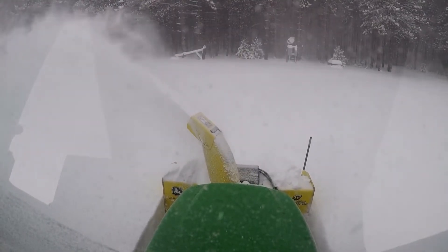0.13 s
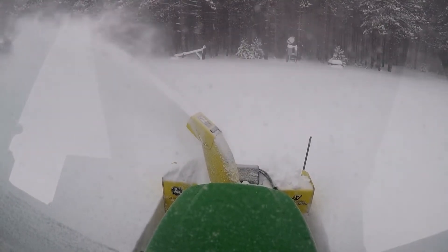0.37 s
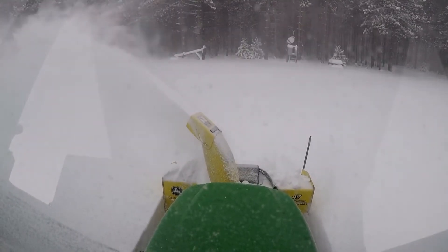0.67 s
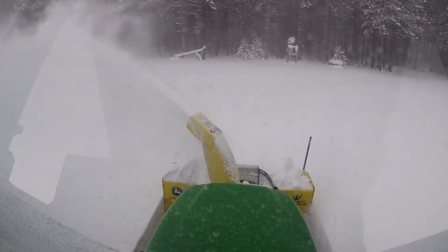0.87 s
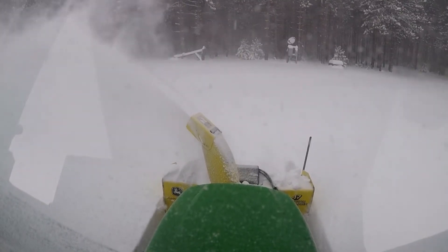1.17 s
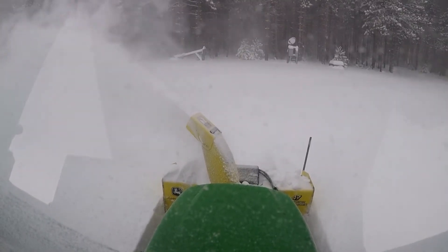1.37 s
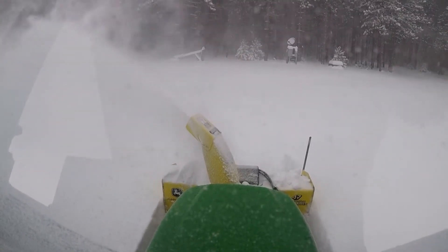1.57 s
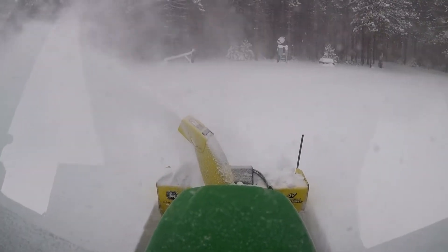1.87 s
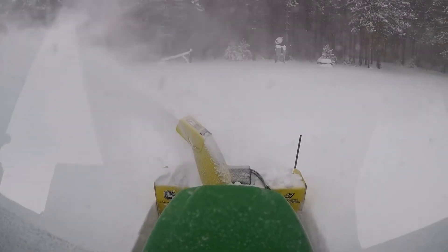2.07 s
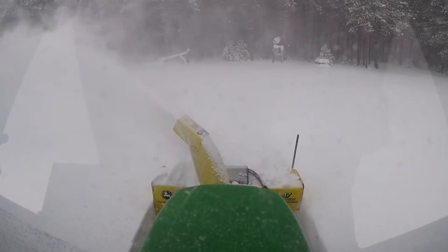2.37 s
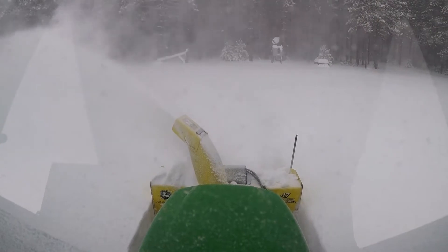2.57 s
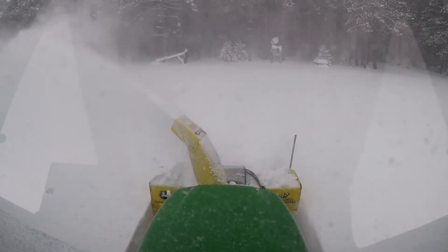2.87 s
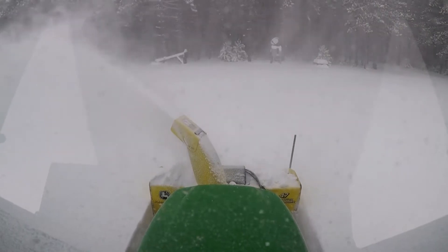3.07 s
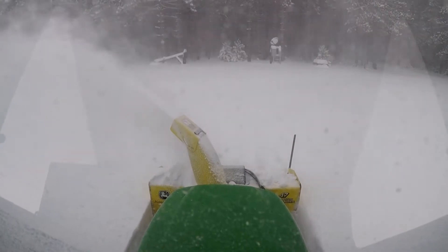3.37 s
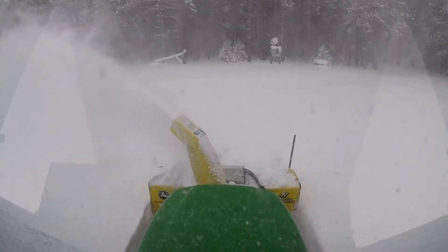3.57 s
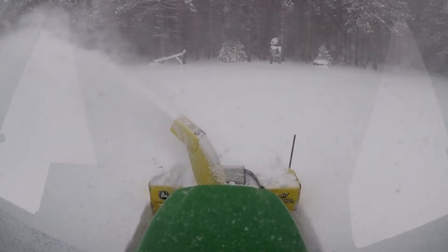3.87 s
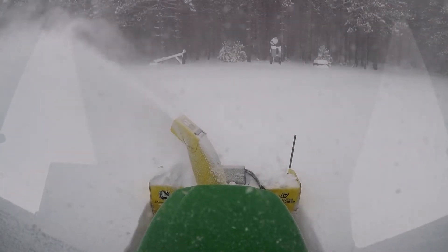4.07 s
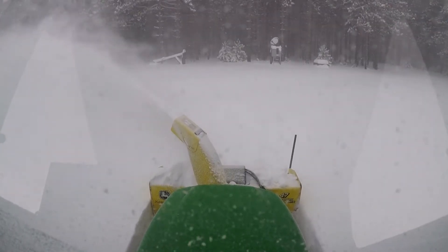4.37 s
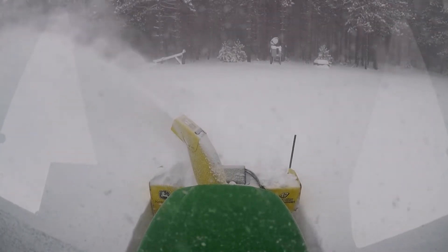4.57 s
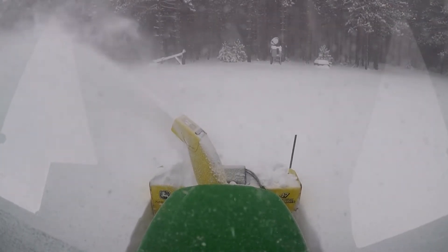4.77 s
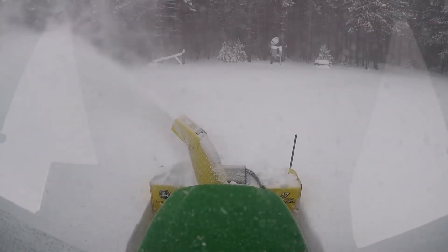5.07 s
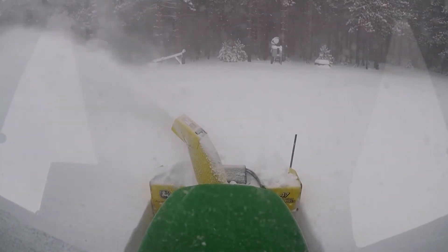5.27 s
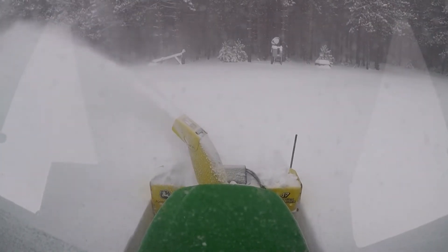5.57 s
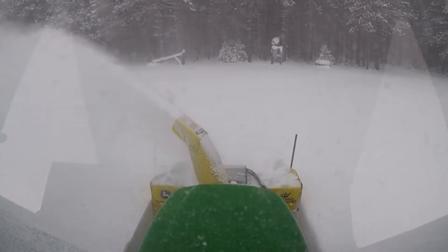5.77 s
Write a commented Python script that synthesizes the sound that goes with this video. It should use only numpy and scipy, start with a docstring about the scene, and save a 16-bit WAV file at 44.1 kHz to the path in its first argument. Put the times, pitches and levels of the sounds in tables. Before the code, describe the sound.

Continuous close engine drone outdoors, dense and low, with fast firing pulses blurred into a buzz. Belt and blower tones beat slowly against it, making the low end pulse and swell, more so in the second half. The housing boom is fuller at first and eases later, while thin gear whine comes and goes. Soft snow hiss sits on top. The microphone rides on the machine; the sound is compressed, dense and even.

```python
"""The two-cylinder engine of a garden tractor hums in firing orders as it pushes a snowblower, heard from the seat.
Exhaust and intake roar, filtered noise, throbs with the firings and rings in tin panels modelled as resonances.
The auger drags the speed once a turn, so the gear whine, a tooth mesh tone, wavers.
Impeller, pump and drive belt, sums of shaft multiples, beat against the engine.
Thrown snow, flickering bands of noise, hisses up the chute."""
import sys
import numpy as np
from scipy import signal
from scipy.fft import rfft, irfft
from scipy.io import wavfile
from scipy.ndimage import uniform_filter1d

SR = 44100
rng = np.random.default_rng(int(sys.argv[2]) if len(sys.argv) > 2 else 0)


def generate_wav(sig):
    """Save sig (samples, or channels by samples) to the path in sys.argv[1] as 16-bit PCM at SR."""
    pcm = np.round(np.clip(np.atleast_2d(sig).T, -1, 1) * 32767).astype(np.int16)
    wavfile.write(sys.argv[1], SR, pcm)


N = 261954
T = np.arange(N) / SR  # time, s
F = np.maximum(np.fft.rfftfreq(N, 1 / SR), 1)  # frequency, Hz

CYCLE_HZ = 27.39  # mean rate of the firing cycle, which is two crank turns
AUGER_HZ, AUGER_RAD = 3.03, -1.38  # turning rate and starting phase
IMPELLER_RATIO = .6  # turns per firing cycle
PIPE_SPREAD_RAD = .4  # phase lag of the engine orders, times the order squared
HISS_SHARE = 0.52  # the hiss swells by this share of the spray's extra dB


def undb(db):
    """Amplitude ratio of a level in decibels."""
    return 10 ** (np.asarray(db) / 20)


def level(x, db):
    """Scaling to a given rms level."""
    return x * undb(db) / np.sqrt(np.mean(x ** 2))


def columns(table):
    """Linear interpolation in time of each column after the first."""
    s, *cols = np.transpose(table)
    return [np.interp(T, s, c) for c in cols]


def walk(rate):
    """Low-pass random process: levels held 1 / rate s and averaged twice; spread near 1."""
    hold = int(SR / rate)
    steps = np.repeat(rng.standard_normal(N // hold + 1), hold)
    smooth = uniform_filter1d(uniform_filter1d(steps, hold), hold)
    return np.sqrt(2) * smooth[:N]


def ring(hz, width):
    """Resonance excited by noise, rms 1; the width is taken at half the peak amplitude."""
    response = 1 / (1 + (2 * (F - hz) / width) ** 2)
    return level(irfft(rfft(rng.standard_normal(N)) * response, N), 0)


def coloured(points, flicker_db, flicker_hz, shared_db):
    """Spectral shaping of noise in half-octave bands; each flickers alone and all share one level change."""
    hz, db = np.transpose(points)
    shape_db = np.interp(np.log(F), np.log(hz), db, left=-99, right=-99)
    shaped = rfft(rng.standard_normal(N)) * undb(shape_db)
    place = 2 * np.log2(F)  # in half octaves
    first = np.floor(2 * np.log2(hz[0]))
    last = np.ceil(2 * np.log2(hz[-1]))
    out = 0
    for band in np.arange(first, last + 1):
        window = np.clip(1 - np.abs(place - band), 0, 1)  # triangles that sum to 1
        out = out + irfft(shaped * window, N) * undb(flicker_db * walk(flicker_hz))
    return level(out, 0) * undb(shared_db)


def orders(angle, table, waver_db, waver_rad, spread_rad=1.3):
    """Fourier series on a shaft angle; higher multiples lag, which spreads each beat over the turn."""
    out = 0
    for k, db in table:
        phase = k * angle - spread_rad * k * k + waver_rad * walk(5)
        amplitude = np.sqrt(2) * undb(db + waver_db * walk(4.02))
        out = out + amplitude * np.sin(phase)
    return out


def crank():
    """Phase as the integral of speed: the auger's load slows it once a turn and the governor hunts."""
    auger_drag = .0053 * np.cos(2 * np.pi * AUGER_HZ * T + AUGER_RAD)  # fraction of the speed
    speed = 1 + auger_drag + 0.00076 * walk(1.982)
    return 2 * np.pi * CYCLE_HZ * np.cumsum(speed) / SR


def engine(angle, boom_db):
    """Periodic firing gives harmonics: low orders stay put, those the housing radiates follow its boom."""
    # orders of the firing cycle: multiple, level/dB (rms, before the boom)
    firing = [(1, -39), (2, -22.5), (3, -23.5), (4, -37.5), (5, -32.5), (6, -24), (7, -46), (8, -24),
              (9, -33.5), (10, -37.5), (11, -38.5), (12, -32), (13, -42.5), (19, -41.5), (24, -44),
              (30, -40), (46, -45)]
    low = orders(angle, firing[:5], waver_db=0.0, waver_rad=0.093, spread_rad=PIPE_SPREAD_RAD)
    high = orders(angle, firing[5:], waver_db=2.02, waver_rad=0.13, spread_rad=PIPE_SPREAD_RAD)
    return low + undb(0.77 * boom_db) * high


def body(angle, boom_db):
    """Forced resonance and interference: roar and ringing panels throb with the firings, paths round the hood cancel."""
    # exhaust and intake roar: f/Hz, relative spectral level/dB (per Hz)
    roar_points = [(12, -41), (20, -15.5), (66, -3.5), (124, -8.5), (216, -4.5), (337, -15.5), (399, -12),
                   (515, -15.5), (573, -13.5), (822, -11.5), (974, -17.5), (1280, -17.5), (1920, -24),
                   (2140, -23.5), (3200, -45), (4160, -80.5), (7040, -120)]
    # ringing tin: f/Hz, width/Hz, level/dB (rms, before the waver)
    panels = [(77.6, 15, -28.5), (511, 34, -39), (643, 40, -47.5), (828.6, 52, -39), (1067, 73, -42),
              (1301, 100, -42), (1430, 81, -43.5), (1609, 98, -45), (1794, 160, -46.5), (2146, 250, -41.5),
              (2643, 51, -53.5), (2740, 110, -55), (4247, 80, -55.5), (4660, 280, -54.5),
              (5720, 240, -55.5), (9500, 100, -70), (10100, 100, -73.5)]
    # blower housing: f/Hz, width/Hz, level/dB (rms, before the boom)
    housing_modes = [(199.5, 42, -27.5), (268.6, 30, -33.5), (311.5, 36, -35.5), (346.3, 19.6, -35)]
    # interference round the hood: f/Hz, width/Hz, gain/dB (mostly dips)
    hood_paths = [(376, 25, -1), (562, 17, -3.5), (1038, 16, -2), (1198, 31, -7), (1910, 89, -5),
                  (2780, 55, 1.5)]
    tin = sum(undb(db + 1.2 * walk(6)) * ring(hz, width) for hz, width, db in panels)
    modes = sum(undb(db) * ring(hz, width) for hz, width, db in housing_modes)
    housing = undb(0.82 * boom_db) * modes
    roar = coloured(roar_points, flicker_db=1.0, flicker_hz=7.8, shared_db=-24 + 0.38 * boom_db)
    throb = 1 + 0.021 * np.cos(angle) + 0.057 * np.cos(2 * angle) + 0.054 * np.cos(3 * angle)
    hood_db = sum(db * np.exp(-(2 * (F - hz) / width) ** 2) for hz, width, db in hood_paths)
    return irfft(rfft(throb * (tin + roar + housing)) * undb(hood_db), N)


def belt(angle):
    """Periodic slap of a belt loop, loudest round a wandering pitch; it also excites a frame resonance."""
    # belt slap: t/s, favoured f/Hz, slap level/dB (at the favoured pitch, before the waver)
    slap_course = [(0.0, 85.6, -28.5), (.45, 88, -29.5), (.8, 98, -30), (1.7, 99, -27), (2.05, 87, -27),
                   (2.75, 88, -22), (3.15, 93, -23), (3.5, 97.3, -21), (4.5, 99.3, -23.5), (4.85, 88, -27),
                   (5.4, 88, -22), (5.7, 94, -21.5), (5.94, 90, -21.5)]
    # multiples of the belt loop's turn
    loop_orders = (16, 17, 18)
    ratio = .2  # loop turns per firing cycle
    favoured_hz, slap_db = columns(slap_course)
    favoured_order = favoured_hz / (ratio * CYCLE_HZ)
    slaps = []
    for k in loop_orders:
        # 12 dB down one multiple off the favoured pitch, but never more than 9.5 dB
        fall_db = np.maximum(-12 * (k - favoured_order) ** 2, -9.5)
        slaps.append((k, slap_db + fall_db))
    frame = undb(slap_db - 2.5) * ring(hz=95.2, width=36)
    return orders(ratio * angle, slaps, waver_db=1.0, waver_rad=0.17) + frame


def impeller(angle):
    """Blade-passing tones of a three-blade rotor geared to the crank."""
    # multiple of the impeller's turn, level/dB (rms, before the waver)
    blades = [(1, -45.5), (2, -43.5), (3, -36), (4, -57.5), (9, -48), (12, -42)]
    return orders(IMPELLER_RATIO * angle, blades, waver_db=7.0, waver_rad=0.73)


def pump(angle):
    """Shaft harmonics of a pump geared to the crank."""
    # multiple of the pump shaft's turn, level/dB (rms, before the waver)
    shaft = [(5, -30.5), (8, -39.5), (17, -37), (20, -39.5)]
    return orders(.5726 * angle, shaft, waver_db=0.5, waver_rad=0.097)


def gear(angle, whine_db):
    """Tooth mesh tone with a side tone, modulated by the load: pushed at each crank turn and as the auger lets go."""
    push = 1 + 0.17 * np.cos(2 * angle) + 0.11 * np.cos(angle)
    free = np.cos(2 * np.pi * AUGER_HZ * T + AUGER_RAD + .9)
    mesh_order = 78.1  # multiple of the firing cycle
    teeth = [(mesh_order, whine_db - 2.5 + 2.2 * free),
             (mesh_order + 4, whine_db - 12.5 + 5 * free)]
    return push * orders(angle, teeth, waver_db=1.2, waver_rad=0.34)


def snow(angle, hiss_db, spray_db):
    """Broadband flow noise: an even rush up the chute and fine spray in uneven puffs, paced by the impeller."""
    # rush of snow: f/Hz, relative spectral level/dB (per Hz)
    rush_points = [(1650, -21), (2800, -2.5), (3220, -4), (5640, -1), (7400, -13.5), (9620, -36),
                   (16300, -120)]
    # fine spray: f/Hz, relative spectral level/dB (per Hz)
    spray_points = [(6000, 4), (7000, -3), (7600, -4.5), (8500, -2), (9800, -14.5), (11000, -17.5),
                    (11300, -26.5), (12200, -29.5), (13200, -29), (15000, -37)]
    rush = coloured(rush_points, flicker_db=0.53, flicker_hz=20, shared_db=hiss_db + .4 * walk(30))
    puffs = walk(55)
    puffs = puffs - uniform_filter1d(puffs, int(.08 * SR))  # quick ones only
    throw_db = 1.36 * np.cos(IMPELLER_RATIO * angle + 1.5 * walk(4))  # one swing an impeller turn
    spray = coloured(spray_points, flicker_db=0.8, flicker_hz=41.0,
                     shared_db=spray_db + throw_db + 1.6 * puffs)
    return rush * undb(HISS_SHARE * throw_db) + spray


def loads():
    """Trapezoidal envelopes: extra spray dB while a thicker load of snow passes up the chute."""
    # thicker loads: t/s (rise complete), length/s (from there to the end of the fall), extra spray level/dB
    passing = [(0.0, 0.89, 4.5), (1.72, .08, 3.5), (1.94, .24, 3), (3.524, 0.24, 1.5), (4.3, .25, 1)]
    edge_s = 0.058  # rise and fall time
    extra_db = 0
    for s, length, db in passing:
        nearest_end = np.minimum(T - s + edge_s, s + length - T)
        extra_db = extra_db + db * np.clip(nearest_end / edge_s, 0, 1)
    return extra_db


def scene():
    """Superposition of the sources, all but the chute's loads tied to one crank angle."""
    # work done: t/s, housing boom level/dB (its mean is removed), gear whine level/dB (before gear's offsets)
    work = [(0.0, -17.5, -36.5), (.5, -16.5, -35), (.8, -15.5, -41.5), (1.3, -17.5, -40),
            (1.75, -16, -39.5), (2.1, -19, -38.5), (2.5, -19, -51), (3.0, -21.5, -50.5), (3.7, -22.5, -43),
            (4.2, -24, -45.5), (4.5, -22, -40.5), (5.3, -21.5, -45.5), (5.5, -21, -48.5),
            (5.94, -19.5, -46.5)]
    boom_db, whine_db = columns(work)
    boom_db = boom_db - boom_db.mean()
    angle, extra_db = crank(), loads()
    drive = belt(angle) + impeller(angle) + pump(angle)
    machine = engine(angle, boom_db) + body(angle, boom_db) + drive + gear(angle, whine_db)
    thrown = snow(angle, hiss_db=-42.5 + HISS_SHARE * extra_db, spray_db=-52 + extra_db)
    return (machine + thrown)[None]


def record(dry):
    """Dynamic compression evens out the beats, soft saturation rounds peaks and a low-pass cuts the top."""
    span = int(0.024 * SR)
    power = uniform_filter1d(uniform_filter1d(dry ** 2, span), span)
    even = dry * (np.mean(power) / power) ** 0.14
    ceiling = 0.8
    rounded = ceiling * np.tanh(1.079 * even / ceiling)
    top = signal.ellip(8, .2, 70, 15100, fs=SR, output="sos")  # order, ripple dB, rejection dB, cutoff Hz
    settled = signal.sosfilt_zi(top)[:, None] * rounded[0, 0]  # no click at the start
    return signal.sosfilt(top, rounded, zi=settled)[0]


dry = scene()
out = record(dry)
generate_wav(out)
```